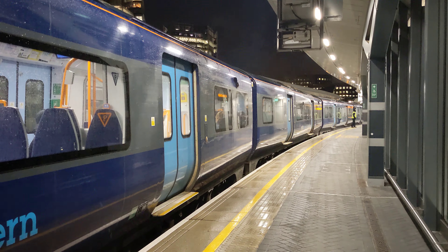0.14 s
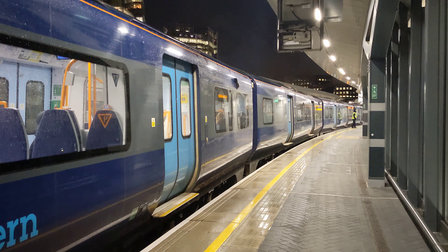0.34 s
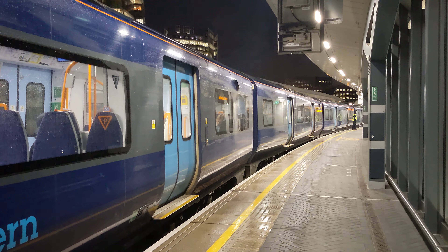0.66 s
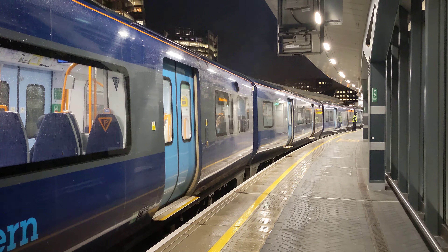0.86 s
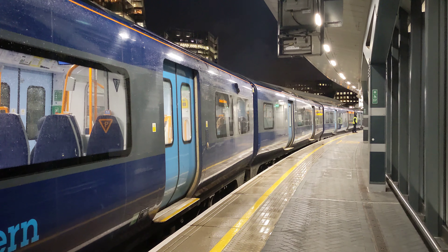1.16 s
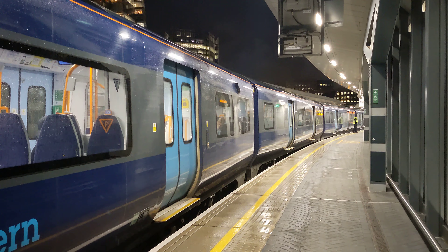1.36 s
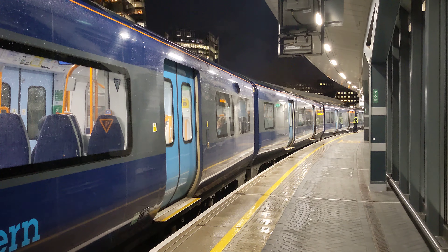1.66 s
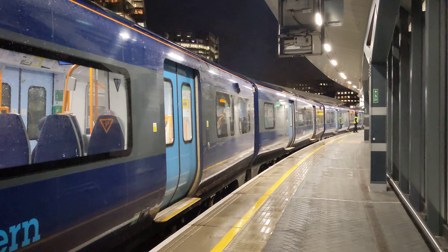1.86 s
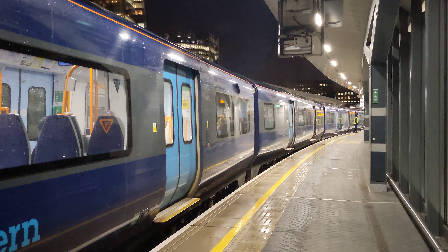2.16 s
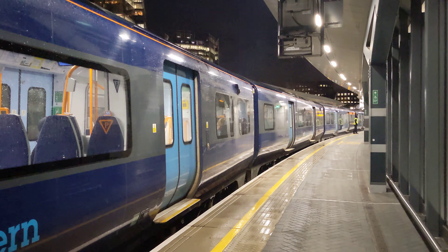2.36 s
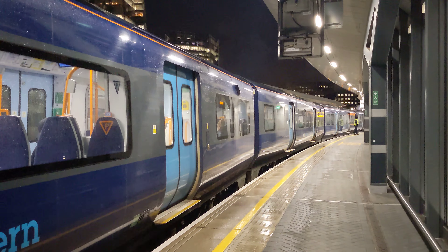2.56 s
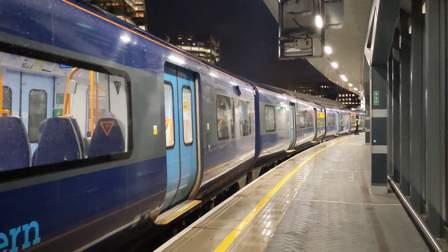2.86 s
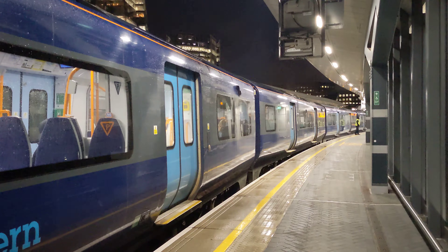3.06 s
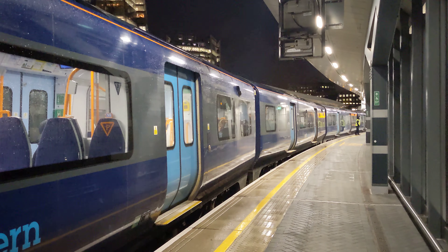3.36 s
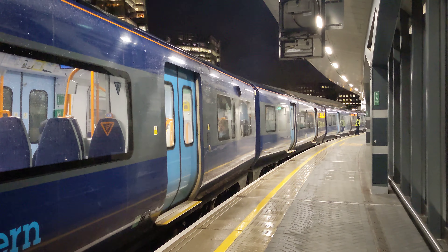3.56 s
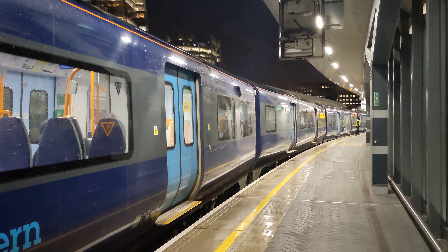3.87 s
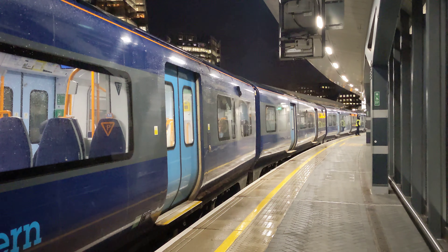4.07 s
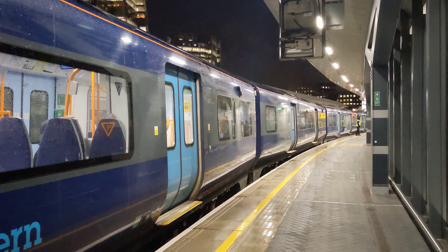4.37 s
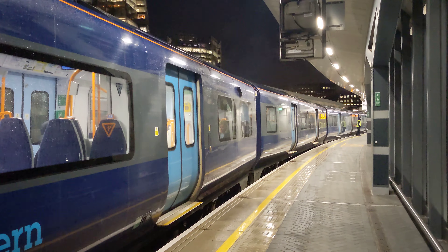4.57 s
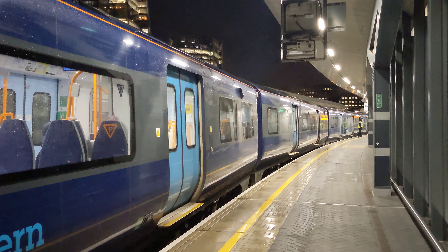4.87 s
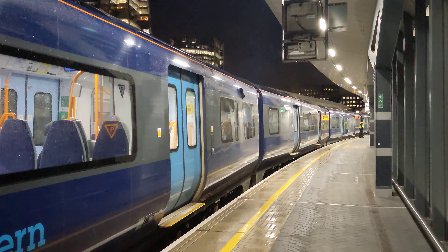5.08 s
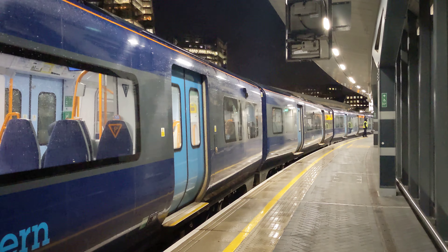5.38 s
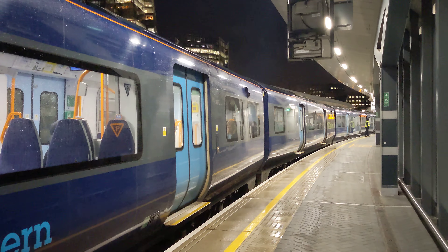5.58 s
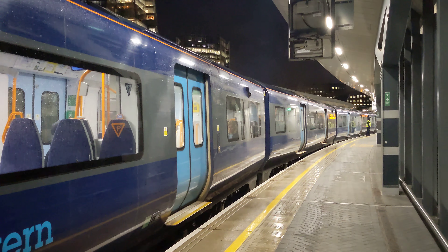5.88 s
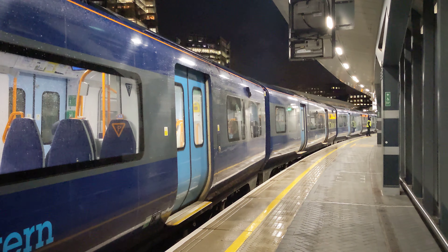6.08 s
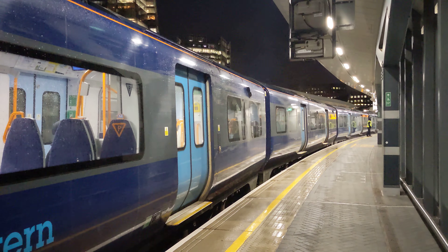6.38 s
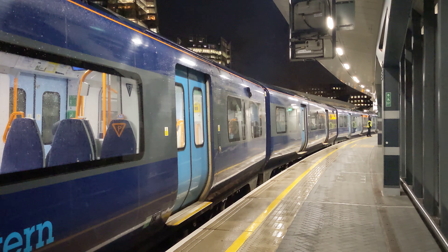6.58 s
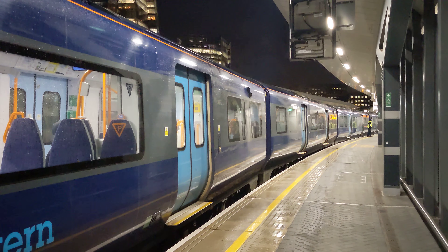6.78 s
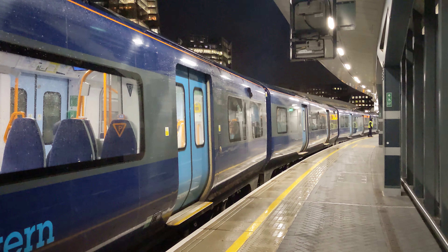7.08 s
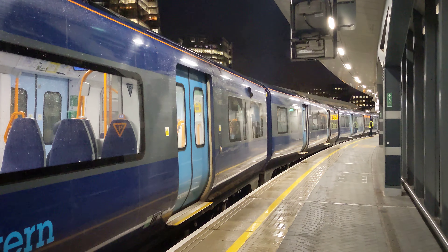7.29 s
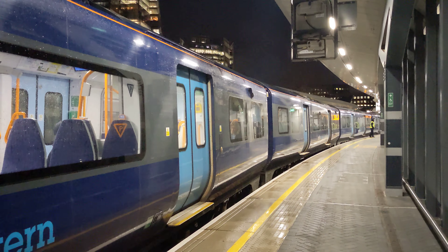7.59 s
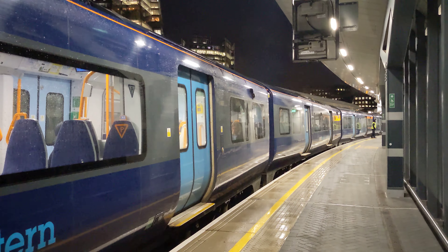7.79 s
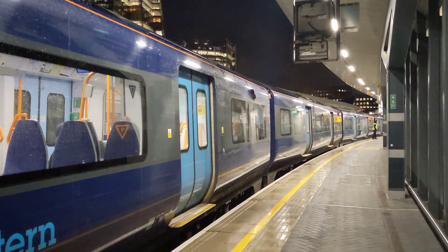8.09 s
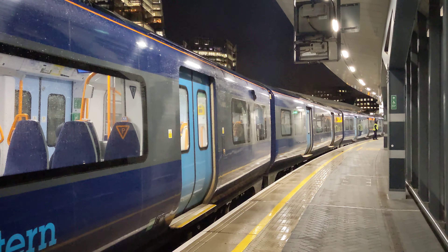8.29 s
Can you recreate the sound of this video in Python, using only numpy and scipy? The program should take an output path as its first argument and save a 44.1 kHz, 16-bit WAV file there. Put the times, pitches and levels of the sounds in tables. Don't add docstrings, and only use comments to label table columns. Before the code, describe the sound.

A handheld stereo microphone stands near an electric train waiting at a covered platform. Throughout, ventilation makes a wide low rumble with soft hiss, strongest below 400 Hz, with fluttering fan hum near 216 and 264 Hz. Thin converter and compressor whines sit around 1.3 to 2.2 kHz, with fainter higher lines. Wind buffets the right channel: a quick popping gust at 0 to 0.2 s, softer flutter to 0.8, a thump at 1.35, then the heaviest cluster of thuds and crackles from 1.8 to 2.6. One brief gust reaches the left near 2.1. A lull follows 2.7, pops return at 3.65, and another cluster runs 4.1 to 4.9, fading by 5.3. Then only machinery remains, a tiny dry tick on the left at 7.2. A compressor whine near 1.4 kHz swells from about 6.1 to 6.5 and stays. From 7.95 to the end at 8.4, faint overlapping brake squeaks, low groan to high squeal.

```python
import sys
import numpy as np
from scipy import signal
from scipy.fft import rfft, irfft, next_fast_len
from scipy.io import wavfile
from scipy.ndimage import uniform_filter1d

SR = 44100
rng = np.random.default_rng(int(sys.argv[2]) if len(sys.argv) > 2 else 0)


def gain_from_db(level_db):
    decades = np.asarray(level_db, float) / 20
    return 10 ** decades


def unload_wav(signal):
    wavfile.write(
        sys.argv[1],
        SR,
        np.round(np.clip(np.atleast_2d(signal).T, -1, 1) * 32767).astype(np.int16),
    )


N = 372204
T = np.arange(N) / SR
SIZE = next_fast_len(N)
HZ = np.maximum(np.arange(SIZE // 2 + 1) * SR / SIZE, 1)
SIDES = np.array([[1], [-1]])

# frequency in Hz, level in dB per Hz.
VENT_RUMBLE = [(15, -74), (30, -70), (55, -58.5), (95, -70.5), (130, -59.5), (180, -53), (260, -59),
               (340, -56), (430, -63.5), (600, -69.5), (760, -72.5), (1000, -73.5), (1200, -74.5),
               (1500, -75.5)]
# frequency in Hz, level in dB per Hz.
VENT_HISS = [(1500, -76), (1900, -77.5), (2600, -81), (3200, -82), (4000, -85.5), (4800, -90.5),
             (5500, -93.5), (5800, -101), (6500, -105), (8000, -109), (9500, -110), (10300, -114),
             (13000, -117), (16000, -121)]
# centre in Hz, width in Hz, gain in dB.
DUCT_PEAKS = [(160, 16, -6), (256, 45, 4), (525, 60, 4), (620, 50, 4), (700, 30, -4), (830, 30, 3),
              (905, 40, 4), (985, 70, 6), (1075, 70, -3), (1155, 40, 3), (2040, 80, 3), (2135, 40, -3),
              (2400, 110, 6), (8020, 200, 2.5), (12300, 900, 1.5)]
# frequency in Hz, likeness from 0 to 1, left minus right in dB.
PORT_PAIR = [(60, 0.96, -2.5), (356, 1, -2), (503, 0.94, 0.5), (865, 0.32, -4), (1330, 0.03, -4.5),
             (1630, 0.44, -1), (2480, 0.29, 3), (2930, 0.06, -0.5), (5300, 0, -1.5), (9000, 0, -1),
             (15000, 0, -3)]
# time in seconds, share of rated speed.
SUPPLY_SPEED = [(0, 1), (4.2, 1), (4.7, .9995), (5.3, 1), (7.0, 1), (7.6, .9995), (8.44, .9995)]
# multiple of the base frequency, level in dB, left minus right in dB.
CONVERTER_LINES = [(20, -67, 2), (21, -63, -4), (22, -68, -10), (33, -72, 8), (40, -80, -2), (41, -72, -2),
                   (42, -69, -2), (43, -75, -5), (44, -81, 1), (50, -75, -5), (51, -76, 2), (52, -72, -3),
                   (53, -81, -1), (54, -75, -9), (55, -78, -5), (59, -92, 8), (60, -94, 0), (61, -91, 2),
                   (62, -92, -1), (63, -88, 0), (64, -91, 4), (65, -95, -1), (67, -97, 0), (76, -97, 5),
                   (82, -96, -1), (83, -95, 3), (84, -95, -2), (85, -94, -2), (89, -95, -8), (90, -97, -3)]
# multiple of the shaft frequency, level in dB, left minus right in dB.
COMPRESSOR_LINES = [(51, -66, -5), (52, -68, -7), (54, -63, 4), (55, -67, 8), (57, -62, -3), (58, -68, -7),
                    (59, -65, -12), (82, -68, -5), (83, -64, 2), (212, -81, -1), (214, -83, 0),
                    (216, -79, 2), (217, -81, -5), (218, -77, -1), (219, -75, -2), (220, -79, -5),
                    (221, -82, -7), (222, -85, 0), (223, -79, -2), (224, -82, -6)]
# centre in Hz, width in Hz, level in dB.
CASING_RINGS = [(8030, 60, -91), (9200, 260, -96), (9480, 60, -97), (10850, 100, -102)]
# time in seconds, level in dB.
VALVE_LEVEL = [(0, -72), (3, -69), (6.1, -62), (6.5, -56), (8.44, -55)]
# frequency in Hz, level in dB, left minus right in dB.
FAN_TONES = [(216, -46, -5), (264, -40.5, 0), (514, -50, -7), (533, -53, 0), (673.6, -59, -6),
             (1012, -62, -9), (1155, -67, 0), (1735, -71, 0), (2013, -71, 2), (2021, -68, -3),
             (2358, -69, 1), (2395, -68, 4), (2697, -71, 1), (3141, -74, 0), (3615, -77, -8)]
# start in seconds, pitch in Hz, length in seconds, level in dB.
BRAKE_SQUEAKS = [
    (7.95, 4490, .15, -65),
    (7.96, 4700, .2, -68),
    (8.0, 940, .1, -53),
    (8.06, 4016, .26, -57),
    (8.05, 1637, .28, -57),
    (8.08, 4888, .3, -65),
    (8.1, 1920, .24, -54),
]
# start in seconds, hold in seconds, level in dB.
RIGHT_PUFFS = [(.06, .08, -21), (.22, 0.42, -30.5), (.43, 0.33, -28), (.68, 0.1, -25.5),
               (1.05, 0.053, -25.5), (1.32, 0.046, -24.5), (1.42, 0.068, -23), (1.63, 0.061, -31.5),
               (1.8, 0.18, -20.5), (2.0, 0.045, -25), (2.12, 0.34, -22), (2.36, 0.18, -20),
               (2.62, .03, -23.5), (2.9, 0.41, -34), (3.62, .07, -22), (3.8, .07, -24.5),
               (3.97, 0.088, -32), (4.1, 0.078, -24.5), (4.24, 0.16, -23.5), (4.47, 0.27, -24.5),
               (4.93, 0.11, -32), (5.1, 0.051, -34), (5.27, .04, -34)]
# start in seconds, hold in seconds, level in dB.
SHELTERED_PUFFS = [
    (2.06, 0.051, -19.5),
    (2.18, 0.07, -33),
    (2.34, 0.1, -31),
    (4.2, 0.097, -37),
]
# time in seconds, peak in dB, pitch in Hz.
SLOW_EDDIES = [(.8, -18, 202), (1.347, -11, 184.3), (1.78, -15, 175), (1.825, -5, 243.5),
               (1.865, -7.5, 224), (1.918, -7, 277.4), (2.116, -9, 169.4), (2.149, -8.5, 161),
               (2.278, -4, 245.7), (2.366, -11, 180.5), (2.442, -14.5, 165), (2.634, -11.5, 208),
               (3.631, -11, 249.3), (3.682, -13, 180.7), (4.1, -15, 296), (4.158, -13, 304.5),
               (4.261, -10, 269), (4.304, -11.5, 240), (4.479, -12.5, 286), (4.631, -13, 234),
               (4.708, -11, 301), (4.853, -11.5, 216), (5.11, -18, 257)]
# time in seconds, peak in dB, pitch in Hz.
QUICK_EDDIES = [(.048, -15, 216), (.057, -14.5, 242.5), (.075, -11, 162), (.106, -13, 168),
                (.122, -6.5, 181), (.148, -15, 318), (.469, -12, 260), (.548, -16, 293), (.599, -15.5, 247),
                (1.888, -9.5, 214), (1.947, -9.5, 213.4), (2.002, -8, 223.6), (2.023, -9.5, 185),
                (2.052, -18.5, 185), (2.076, -7.5, 232), (2.171, -6.5, 198.5), (2.21, -6.5, 213),
                (2.26, -10, 289.5), (2.421, -11, 255), (2.466, -11.5, 202.4), (2.487, -9.5, 285),
                (4.336, -15.5, 170), (4.39, -13, 335), (4.405, -23, 155), (4.498, -11.5, 200.5),
                (4.55, -13, 392), (4.563, -16, 173)]
# time in seconds, peak in dB.
SHARP_SNAPS = [(.062, -17.5), (0.1337, -6.5), (.149, -19), (1.351, -22.5), (1.823, -17), (1.863, -14.5),
               (1.913, -15), (1.926, -20.5), (2.1618, -11.5), (2.17, -7.5), (2.19, -10.5), (2.219, -17),
               (2.247, -18), (2.26, -13), (2.279, -15), (2.2925, -11), (2.299, -7), (2.338, -17.5),
               (2.425, -16.5), (2.532, -15.5), (3.672, -20.5), (4.155, -14.5), (4.261, -17.5), (4.3, -19),
               (4.478, -11.5), (4.624, -20), (4.705, -14), (4.718, -16), (4.85, -13), (5.027, -17.5)]
# time in seconds, peak in dB, left minus right in dB.
DRY_TICKS = [
    (4.5675, -60, -11),
    (7.2015, -58, 7),
]


def over_hz(table, column=1):
    rows = np.array(table)
    return np.interp(np.log(HZ), np.log(rows[:, 0]), rows[:, column])


def white():
    return rfft(rng.standard_normal(SIZE)) * np.sqrt(SR / 2)


def unit(x):
    return x / np.sqrt(np.mean(x ** 2))


def walk(rate):
    points = 16
    step = SR / rate / points
    held = np.repeat(rng.standard_normal(int(N / step / points) + 2), points)
    slewed = uniform_filter1d(uniform_filter1d(held, points), points)
    return np.interp(np.arange(N) / step, np.arange(len(slewed)), unit(slewed))


def band(lo_hz, hi_hz, low_slope, high_slope):
    low_edge = 1 + (lo_hz / HZ) ** low_slope
    high_edge = 1 + (HZ / hi_hz) ** high_slope
    return unit(irfft(white() / np.sqrt(low_edge * high_edge), SIZE)[:N])


def ventilation(swell_db=.25, flicker_db=.7, left_lag_s=13.4 / 44100):
    db = over_hz(VENT_RUMBLE + VENT_HISS[1:])
    for hz, width_hz, gain_db in DUCT_PEAKS:
        db = db + gain_db * np.exp(-((HZ - hz) / width_hz) ** 2 * 2)
    like = np.clip(over_hz(PORT_PAIR), 0, 1)
    late = np.exp(-2j * np.pi * HZ * left_lag_s * np.array([[1], [0]]))
    shared = np.sqrt(like) * white() * late
    separate = np.sqrt(1 - like) * np.array([white(), white()])
    air = (shared + separate) * gain_from_db(db + SIDES * over_hz(PORT_PAIR, column=2) / 2)
    octave = np.clip(np.log2(HZ / 32), 0, 9)
    swell, out = walk(2), 0
    for k in range(10):
        part = irfft(air * np.clip(1 - abs(octave - k), 0, 1), SIZE)[:, :N]
        out = out + part * gain_from_db(swell_db * swell + flicker_db * walk(6.5))
    return out


def rotor(hz, multiple, db, pan_db, spread=1):
    size = 2 ** 15
    lines = np.zeros((2, size // 2 + 1), complex)
    shared, own = rng.random((2, len(multiple)))
    phases = np.exp(2j * np.pi * (shared + spread * own * (SIDES > 0)))
    lines[:, np.int_(multiple)] = gain_from_db(db + SIDES * pan_db / 2) * phases * size / np.sqrt(2)
    speed = np.interp(T, *np.transpose(SUPPLY_SPEED))
    place = np.cumsum(hz * speed / SR) % 1 * size
    turns = irfft(lines, size)
    return np.array([np.interp(place, np.arange(size + 1), np.append(turn, turn[0])) for turn in turns])


def converter(base_hz=100.72):
    return rotor(base_hz, *np.transpose(CONVERTER_LINES), spread=.45) * gain_from_db(walk(4) - 1.5)


def compressor(shaft_hz=24.762, scatter_db=2.5):
    low = rotor(shaft_hz, *np.transpose(COMPRESSOR_LINES), spread=.4) * gain_from_db(walk(4))
    pressure = gain_from_db(np.interp(T, *np.transpose(VALVE_LEVEL)))
    valve = rotor(shaft_hz, [56], 0, -5, spread=.2) * pressure
    multiple = np.arange(300, 450)
    power = 0
    for hz, width_hz, db in CASING_RINGS:
        power = power + gain_from_db(db) ** 2 / (1 + (2 * (multiple * shaft_hz - hz) / width_hz) ** 4)
    level_luck, pan_luck = scatter_db * rng.standard_normal((2, len(multiple)))
    comb = rotor(shaft_hz, multiple, 10 * np.log10(power) + level_luck, -6 + pan_luck)
    return low + valve + comb


def fans(waver_db=3, drift_hz=2.2):
    out = 0
    for hz, db, pan_db in FAN_TONES:
        turns = np.cumsum((hz + drift_hz * walk(12)) / SR) + .2 * rng.random((2, 1))
        level = gain_from_db(db + SIDES * pan_db / 2) * gain_from_db(waver_db * walk(14))
        out = out + np.sqrt(2) * level * np.sin(2 * np.pi * turns)
    return out


def brakes():
    out = np.zeros((2, N))
    for s, hz, length, db in BRAKE_SQUEAKS:
        i = int(s * SR)
        age = (T[i:] - s) / length
        shape = 2.5 * age * np.exp(1 - 2.5 * age) * gain_from_db(db + 2.5 * walk(15)[i:])
        out[:, i:] += shape * np.sin(2 * np.pi * (hz * T[i:] + .2 * rng.random((2, 1))))
    return out


def puffs(table, rise_db_s=302.5, fall_db_s=204):
    t = T[::64]
    each = []
    for s, hold, db in table:
        climb, fall = rise_db_s * (s - t), fall_db_s * (t - s - hold)
        each.append(db - np.maximum(0, np.maximum(climb, fall)))
    return np.interp(T, t, np.max(each, axis=0))


def buffet(body_db, bass_db, edge_db, flutter_db=1.5):
    flutter = flutter_db * unit(walk(18) + walk(45))
    bass = band(24, 90, 5, 4.2) * gain_from_db(bass_db + flutter - 3.5)
    body = band(130, 200, 12, 5.6) * gain_from_db(flutter - 2.5)
    edge = band(330, 700, 4, 6) * gain_from_db(edge_db + flutter + 1.5 * walk(150) - 10)
    return gain_from_db(body_db) * (bass + body + edge)


def eddies(table, rise, slowing, strike):
    out, lead = np.zeros(N + SR), 1000
    t = np.arange(-lead, 3 * lead) / SR
    for (s, db, hz, width), turn in zip(table, rng.random(len(table))):
        age = t / width
        shape = np.exp(-np.where(age < 0, (age / rise) ** 2, abs(age) ** 0.92))
        slow_down = np.exp(-slowing * np.clip(age, 0, 2))
        first_strike = strike * np.exp(-np.clip(age + rise, 0, None) / 0.17)
        turns = np.cumsum(hz * (slow_down + first_strike)) / SR + turn
        i = int(s * SR) - lead
        out[i:i + len(t)] += gain_from_db(db) * shape * np.sin(2 * np.pi * turns)
    return out[:N]


def wind(wake_s=0.0062, wake_db=-9, wake_bass_db=-8):
    level = puffs(RIGHT_PUFFS)
    edge_db = -14.5 + .1 * np.clip(level + 27.5, -20, 20)
    right = buffet(level, -0.5, edge_db)
    slow = [(s, db, hz, 2.3 / hz) for s, db, hz in SLOW_EDDIES]
    slow += [(s, db, hz, 1.43 / hz) for s, db, hz in QUICK_EDDIES]
    s, db = np.transpose(SHARP_SNAPS)
    hz = 699 + 12.0 * (db + 15) + 47 * rng.standard_normal(len(s))
    snaps = np.transpose([s, db, hz, 0.96 / hz])
    hits = eddies(slow, 0.25, .27, 0.598) + eddies(snaps, 0.59, 0.29, .6)
    keep = np.exp(-1 / (wake_s * SR))
    wake = np.sqrt(signal.lfilter([1 - keep], [1, -keep], hits ** 2))
    rough = gain_from_db(wake_db) * band(410, 433, 4.3, 6.8) + gain_from_db(wake_bass_db) * band(28, 95, 2.7, 4.2)
    left = buffet(puffs(SHELTERED_PUFFS), -7.0, -16.5)
    return np.array([left, right + hits + wake * rough])


def ticks(decay_s=.002):
    treble, out = band(9000, 14500, 6, 4), 0
    for s, db, pan_db in DRY_TICKS:
        decay = (T > s) * np.exp(-abs(T - s) / decay_s)
        out = out + treble * decay * gain_from_db(db + SIDES * pan_db / 2)
    return out


def scene():
    train = ventilation() + converter() + compressor() + fans() + brakes()
    return train + wind() + ticks()


def roll_off(x):
    return signal.sosfilt(signal.butter(12, 15680, fs=SR, output="sos"), x)


def record(dry):
    return roll_off(dry)


dry = scene()
out = record(dry)
unload_wav(out)
```